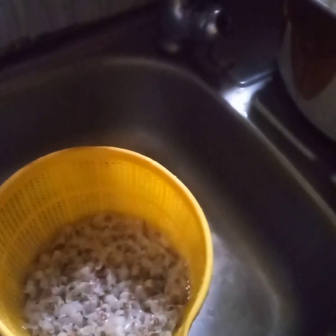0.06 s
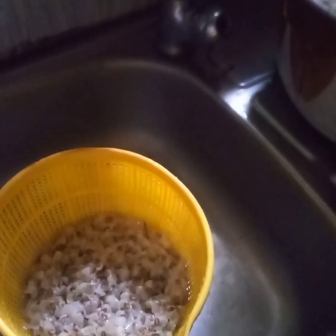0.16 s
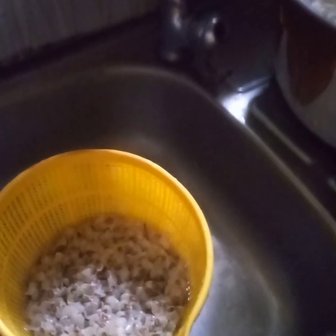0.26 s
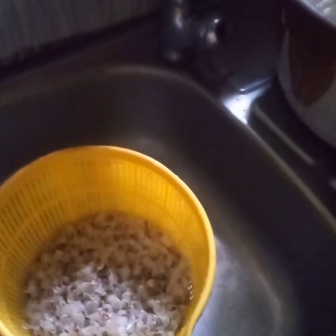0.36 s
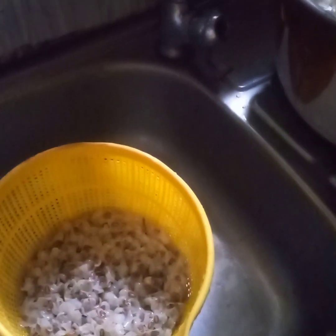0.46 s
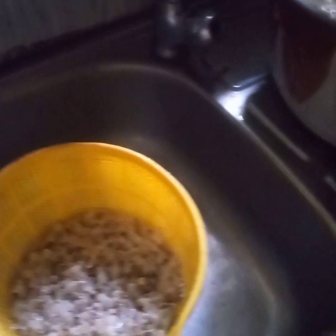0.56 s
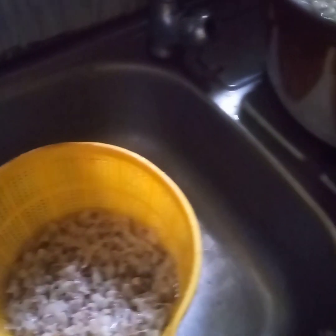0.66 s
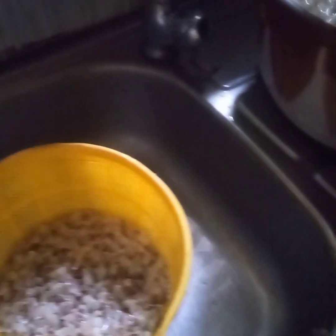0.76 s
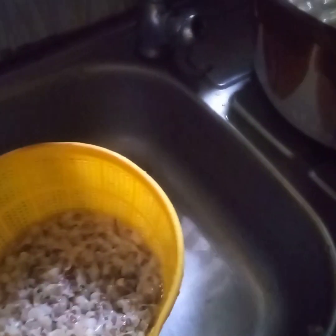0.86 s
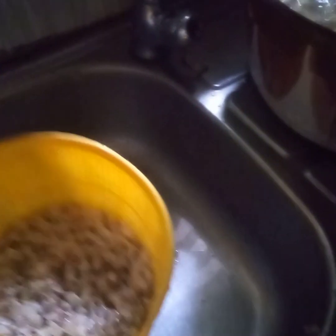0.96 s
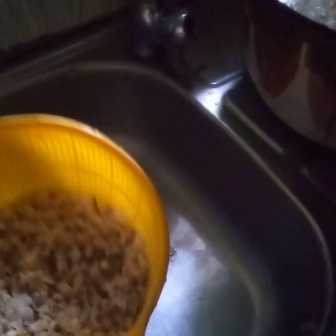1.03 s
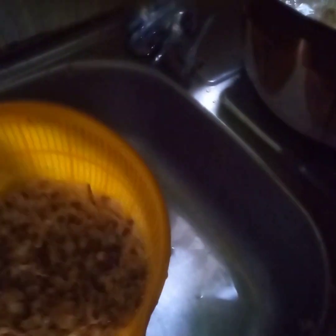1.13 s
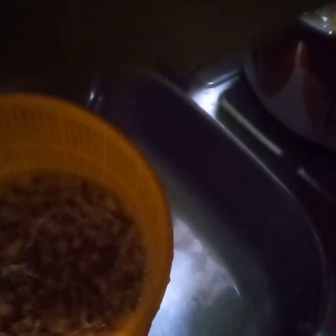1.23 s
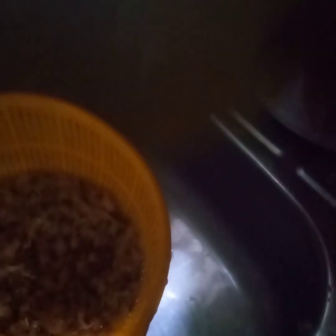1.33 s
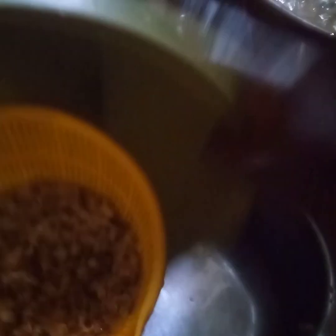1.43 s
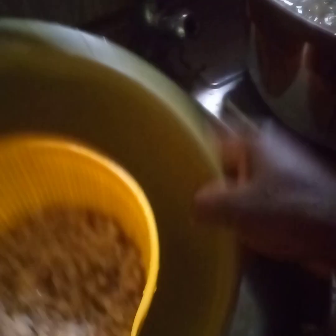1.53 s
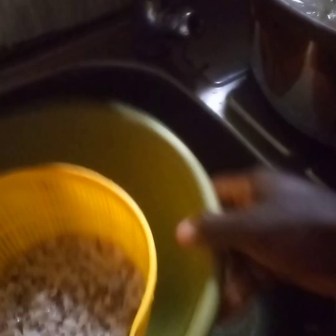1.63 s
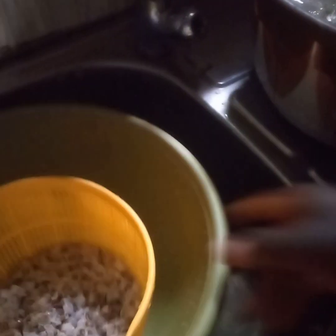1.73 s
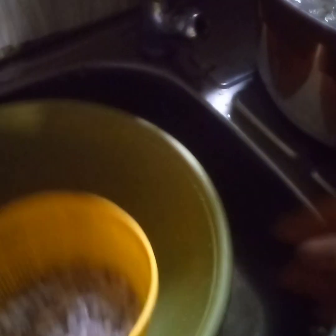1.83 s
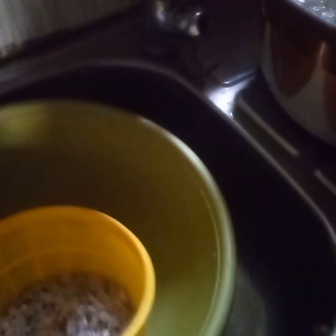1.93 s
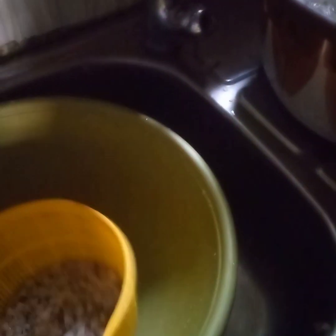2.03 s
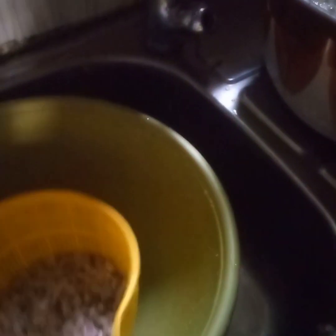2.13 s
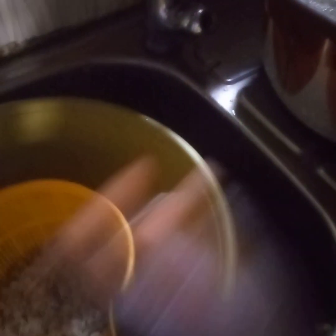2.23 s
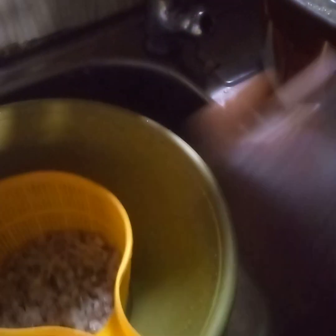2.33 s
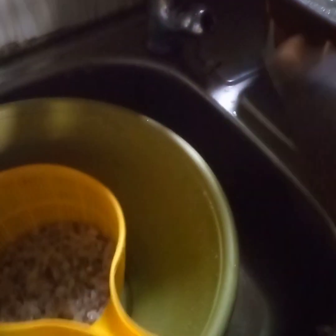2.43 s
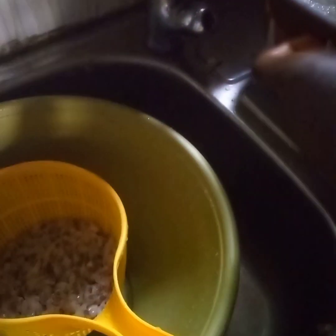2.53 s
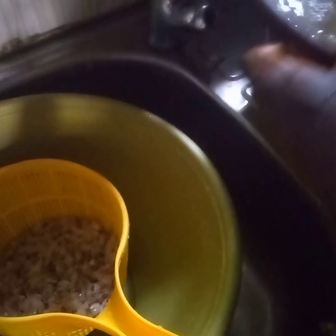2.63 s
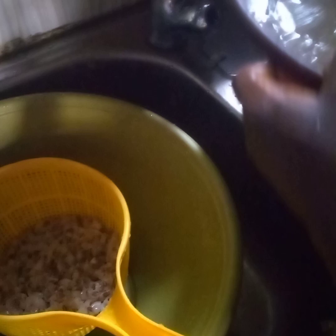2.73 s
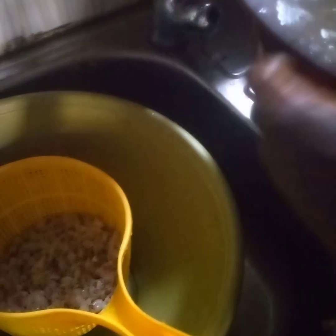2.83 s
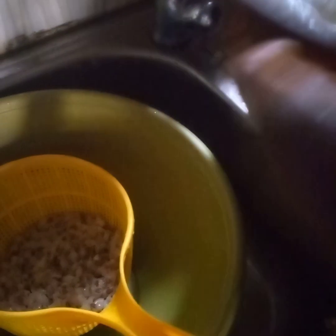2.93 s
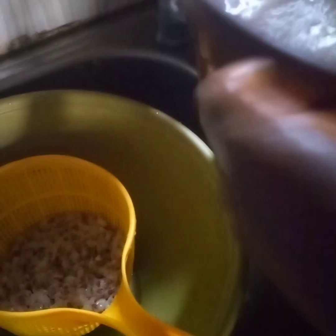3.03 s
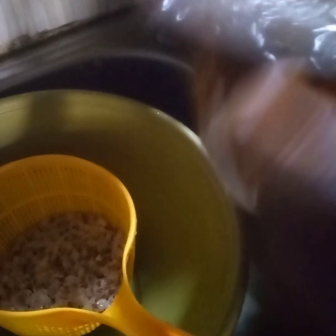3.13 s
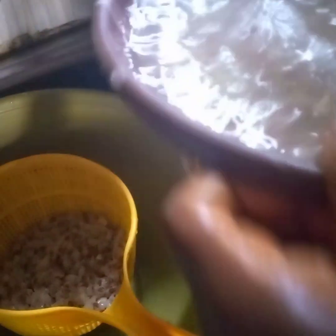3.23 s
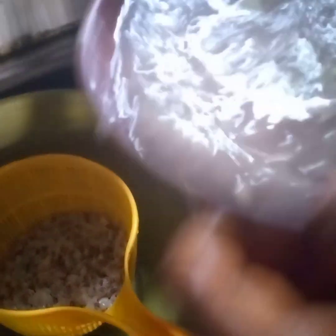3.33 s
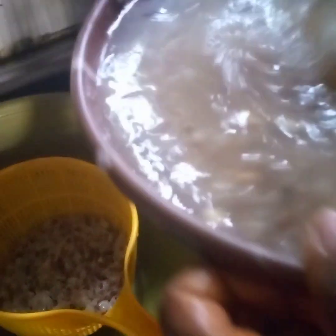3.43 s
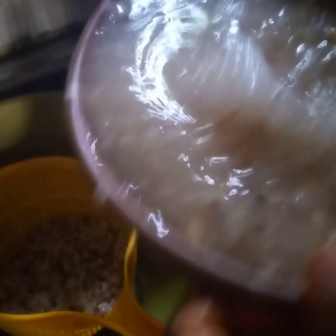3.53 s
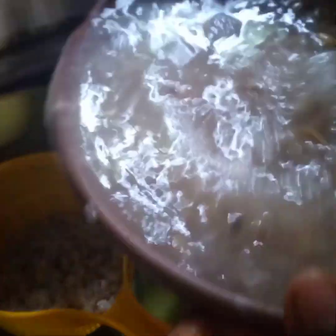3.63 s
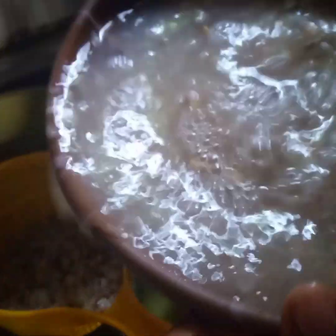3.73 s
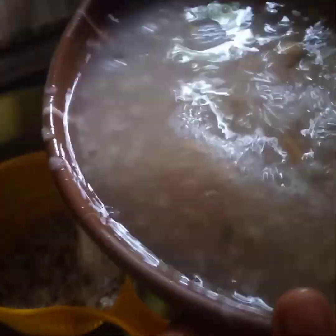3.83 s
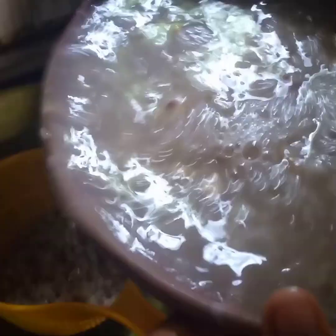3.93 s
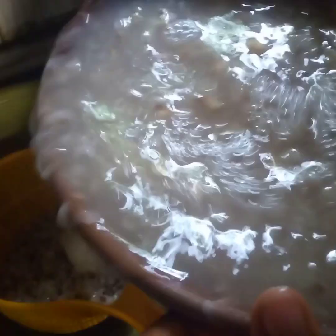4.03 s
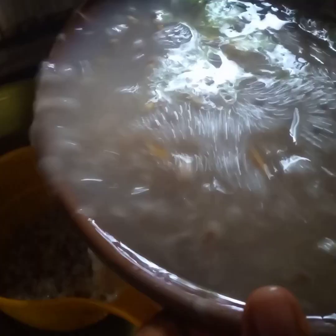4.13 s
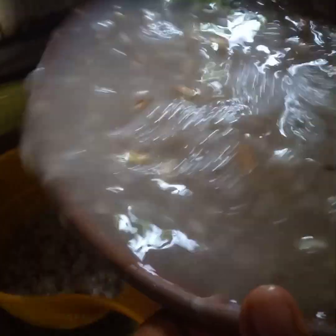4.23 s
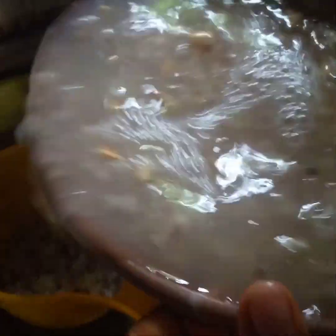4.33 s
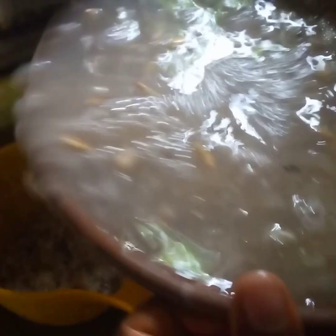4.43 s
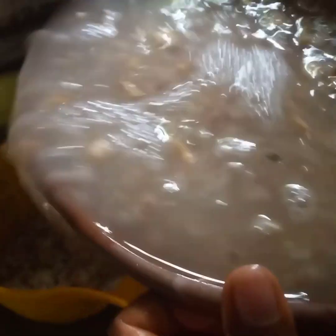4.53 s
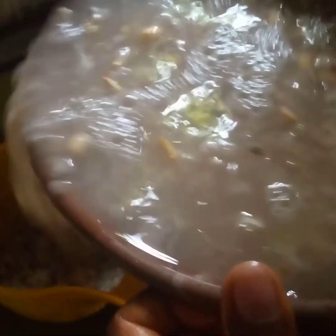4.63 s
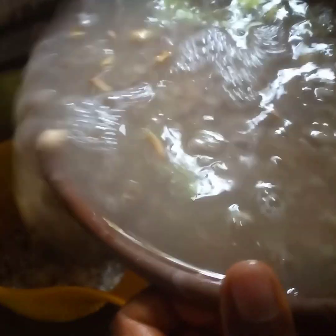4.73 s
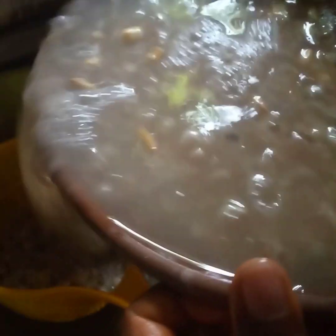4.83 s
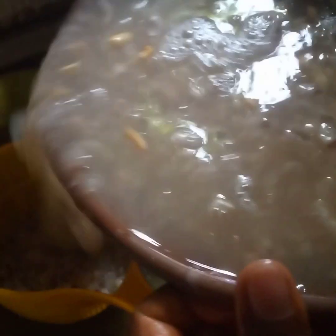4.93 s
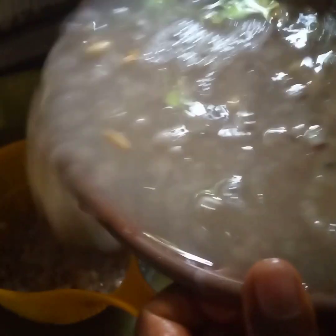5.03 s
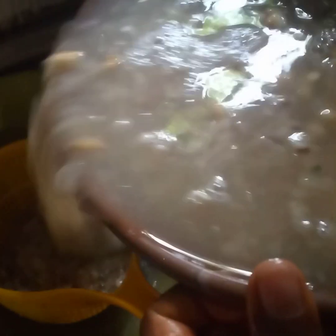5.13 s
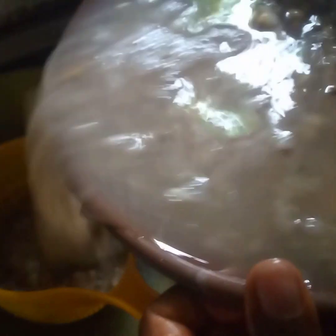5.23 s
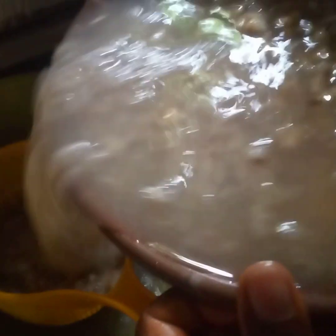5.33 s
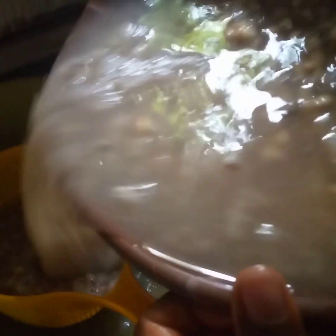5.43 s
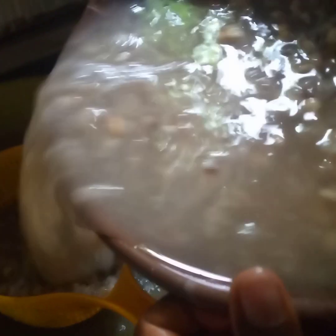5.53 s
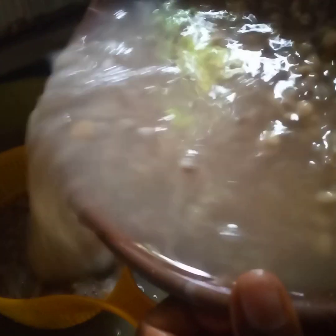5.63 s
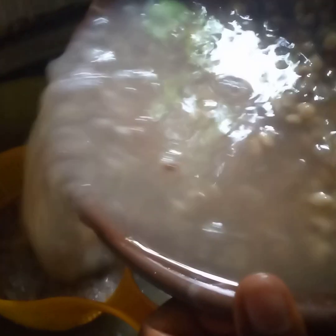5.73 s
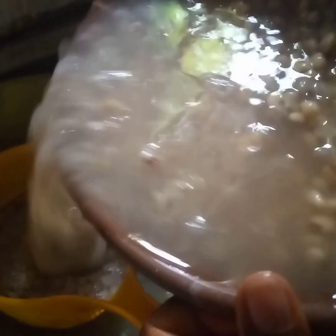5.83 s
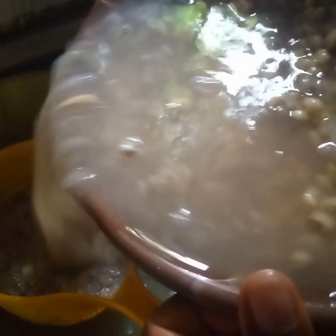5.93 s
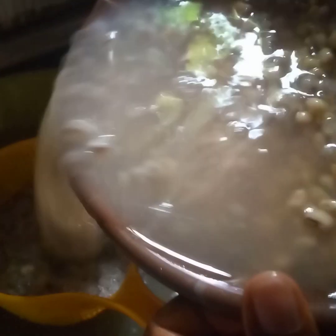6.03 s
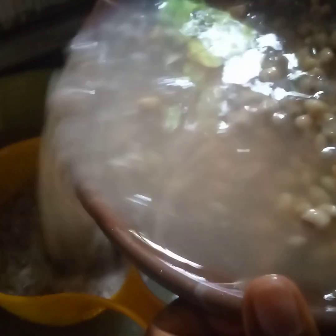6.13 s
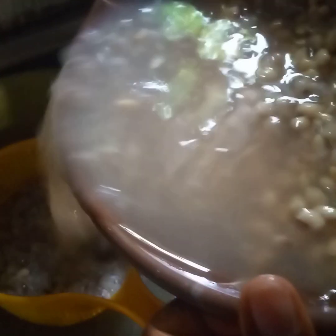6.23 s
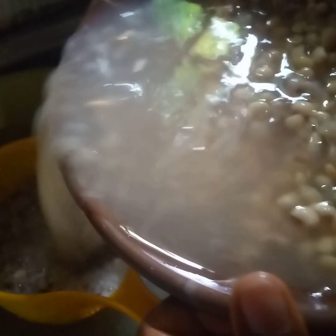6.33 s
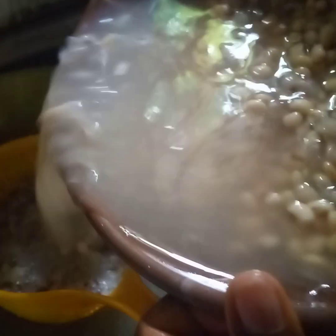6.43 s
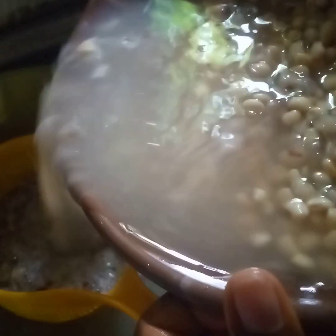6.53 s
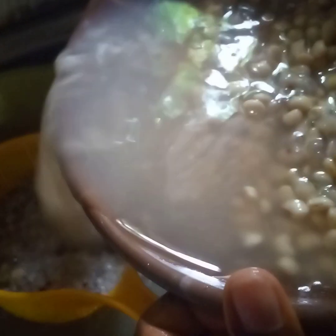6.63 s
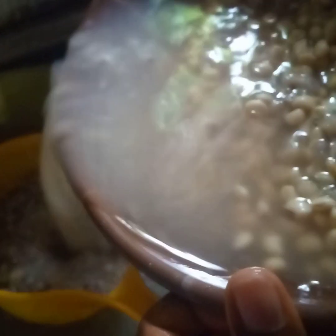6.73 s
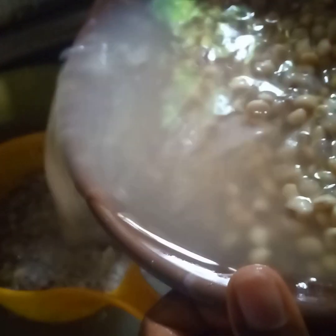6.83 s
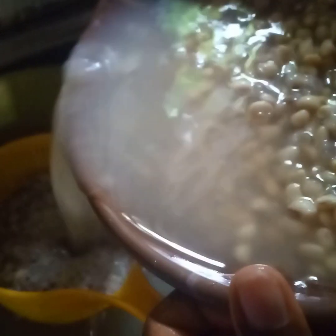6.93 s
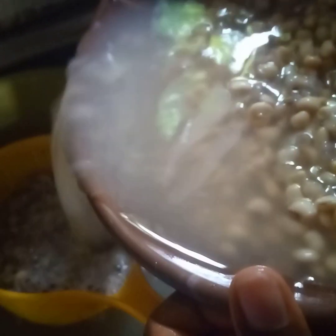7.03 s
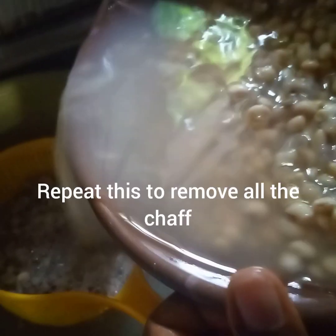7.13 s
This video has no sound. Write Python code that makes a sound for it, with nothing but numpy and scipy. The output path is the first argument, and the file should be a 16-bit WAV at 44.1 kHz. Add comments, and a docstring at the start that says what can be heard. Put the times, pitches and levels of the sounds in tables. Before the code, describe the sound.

A thin draining trickle with bright little plops fades within a second. Several hollow plastic-on-metal knocks follow, with soft sloshing and light thumps. Near silence comes next, only faint room air and a small distant bird. Then a small spill leads into a steady, clumpy pour, full of wet slaps, hard ticks and deepening gurgles, heard close in a short, hard kitchen echo.

```python
"""Small, hard kitchen, close by: water trickles through a plastic sieve into a steel sink and dwindles to drips.
A plastic basin is knocked into the sink under the sieve; rinsing water poured off a bowl of beans splatters in.
A small bird chirps now and then over faint room air. Water is filtered random impacts plus chirped bubble
tones; knocks are noise bursts and damped modes; the bird is two gliding sines with an echo."""
import sys
import numpy as np
from scipy import signal
from scipy.fft import rfft, irfft
from scipy.io import wavfile
from scipy.ndimage import uniform_filter1d

SR = 44100
rng = np.random.default_rng(int(sys.argv[2]) if len(sys.argv) > 2 else 0)


def master_out(mix):
    """Clip the mix to full scale and print it as 16-bit PCM to the path in sys.argv[1]."""
    frames = np.transpose(np.atleast_2d(mix))
    ceiling = np.clip(frames, -1, 1)
    pcm = np.round(ceiling * 32767).astype(np.int16)
    wavfile.write(sys.argv[1], SR, pcm)


N = 316197
T = np.arange(N) / SR

# Levels are ahead of the microphone; t60 = time to fall 60 dB.
# water draining through the sieve, before the trims in trickle(): [t/s, splash level/dB, gurgle level/dB]
DRAIN_LEVELS = [(0.0, -40.5, -51.5), (0.264, -45, -52), (0.294, -45.5, -58.5), (0.426, -49.5, -52),
                (0.464, -40, -48.5), (0.51, -44, -52.5), (0.572, -47, -42), (0.692, -36.5, -49),
                (0.8, -56, -50)]
# water sloshing in sink and basin; the last is the bowl scraping off the counter:
# [start t/s, hold/s, splash level/dB, gurgle level/dB]
SLOSH_AND_SCRAPE_SWELLS = [(1.276, 0.64, -63, -52.5), (2.046, 0.53, -60, -52.5), (2.379, 0.045, -79, -46),
                           (2.543, 0.23, -53, -51.5)]
# spectra of drain, slosh (and scrape) and pour: [f/Hz, relative level/dB per Hz]
DRAIN_SPECTRUM = [(29, -54), (50, -26.5), (125, -6), (353, 2), (428, -5.5), (483, 0.5), (711, -4),
                  (1240, -3), (1430, -6.5), (1910, -3), (4140, -9.5), (6710, -10.5), (13500, -18),
                  (16000, -18.5)]
SLOSH_SPECTRUM = [(29, -52.5), (50, -21), (119, -10), (264, -15.5), (362, 1.5), (408, -9), (472, -8),
                  (746, -22), (1210, -18.5), (3330, -29), (9870, -38), (13500, -52.5), (16000, -47)]
POUR_SPECTRUM = [(24, -55), (40, -20.5), (180, -7), (372, -5.5), (422, -9.5), (570, -4.5), (770, -9.5),
                 (918, -5), (1120, -7), (1680, -6.5), (2210, -9.5), (6490, -8.5), (10200, -11.5),
                 (13400, -18), (16000, -13)]
# strength of the poured stream, before its random clumping: [t/s, level/dB]
POUR_FLOW = [(4.25, -50), (4.3, -33.5), (4.38, -42.5), (4.45, -41), (4.65, -35), (5.35, -34.5), (5.6, -35),
             (5.92, -33.5), (6.3, -33.5), (6.55, -35.5), (6.96, -37), (7.1, -39.5)]
# resonances of the basin's hollow, added to the stream: [f/Hz, width/Hz, level/dB]
HOLLOW_MODES = [(200, 90, -7), (576, 42, 3), (931, 45, -5), (1320, 30, -10), (1690, 150, -9),
                (2740, 60, -12)]
# slaps of water and falling beans, before trim: [t/s, peak level/dB, centre f/Hz, spray level/dB]
SPLAT_EVENTS = [(0.3146, -28, 6000, -1), (0.3695, -30.5, 3260, -4), (0.6509, -25.5, 6930, -10),
                (0.677, -23, 3580, -20), (0.7138, -27, 6800, -10), (0.839, -31.5, 4990, -20),
                (0.8917, -34.5, 3420, -13), (1.6302, -39, 2420, -21), (3.9299, -30.5, 2580, -11),
                (4.2774, -24.5, 2596, -11), (4.4654, -18, 6700, -12), (4.621, -24, 2700, -7),
                (4.699, -19.5, 2100, -9), (4.8995, -21, 6200, -10), (5.0293, -19.5, 4290, -1),
                (5.1422, -27, 4600, -5), (5.1663, -19, 5600, -17), (5.2694, -21, 3080, 1),
                (5.3108, -12.5, 5560, -7), (5.4377, -17, 5700, -13), (5.6408, -17.5, 6690, -18),
                (5.902, -10.5, 8800, -13), (6.0246, -19.5, 6600, -14), (6.0841, -21, 2940, -1),
                (6.2906, -19, 4720, -15), (6.3814, -13.5, 7800, -9), (6.3855, -17.5, 6960, -19),
                (6.4648, -14, 2700, -11), (6.7703, -19, 3450, 7), (6.8488, -18, 3060, -6),
                (6.9571, -17, 2000, -11), (7.1492, -18.5, 2060, -8)]
# spectrum of slap and spray: [f/Hz, relative level/dB]
SPRAY_SPECTRUM = [(100, -3), (600, -13), (3000, 5), (7000, 9), (10500, 3.5), (13000, -30), (15500, -8)]
# hard ticks of beans hitting the plastic, some at the front of a splat: [t/s, peak level/dB, centre f/Hz]
TICK_EVENTS = [(4.465, -21, 6600), (4.621, -19, 4000), (4.898, -17, 10000), (5.0285, -15, 4300),
               (5.7272, -14, 4400), (5.8584, -14, 10000), (6.33, -21, 15000), (6.3805, -15, 8000),
               (6.748, -22, 7300), (6.847, -17, 3100), (7.0302, -16, 5900), (7.1484, -16, 2100)]
# drips and single bubbles, before trim: [t/s, peak level/dB, pitch f/Hz]
DRIP_EVENTS = [(.289, -30, 3010), (0.413, -29.5, 2970), (.823, -32.5, 1244), (0.914, -31, 1240),
               (.947, -38, 2120), (0.993, -39, 6890), (0.999, -31.5, 1262), (1.021, -43, 3080),
               (1.068, -34, 9600), (1.072, -40, 1274), (1.128, -25, 3680), (1.154, -27, 1306),
               (1.317, -32, 2780), (1.563, -33, 1346), (2.938, -57, 6680), (3.041, -58, 9080),
               (4.567, -29, 950), (4.804, -28.5, 310), (5.03, -33, 243), (5.04, -23.5, 1664),
               (5.083, -23.5, 1770), (5.098, -23.5, 933), (5.5, -24, 780), (5.525, -25, 760),
               (5.55, -27, 600), (5.955, -22.5, 607), (6.957, -17.5, 1895)]
# knocks of basin and sieve on the sink; at 2.2-2.4 s low slosh laps, from 2.6 s soft bowl thumps;
# before room and trims:
# [t/s, force level/dB, then re force: wall ring/dB, floor thud/dB, contact crack/dB, rim tock/dB]
KNOCK_EVENTS = [(1.175, -18.5, -15, -9, -2, -30), (1.257, -27, -27, -20, -24, -35),
                (1.3513, -17.5, -8, -21, 3.5, 12), (1.388, -10.5, -2.5, -24.5, -28, 7.5),
                (1.7163, -9, -9, -10, 7.5, -1), (1.7427, -8, -10.5, -12.5, -2, 5),
                (1.764, -14, -4, -6, -22, 1), (1.899, -18.5, 2.5, -9.5, -7, 3.5),
                (1.96, -17.5, -3, -20, -1, -8), (1.9832, -13, -9, -46, -11, -15),
                (2.069, -24.5, -12.5, -19, -9, 2), (2.224, -42.5, 5, -16, -22, 2),
                (2.411, -41.5, 4, -25, -19, 4), (2.614, -54.5, 1, 23.5, -9, -4),
                (2.636, -52, 16, 21, 25, 3), (2.695, -52, 17.5, 16, 21, 12)]
# modes of basin and sink wall, sink floor, heavily damped plastic rim: [f/Hz, level/dB, t60/s]
WALL_MODES = [(244, 7.5, 0.2), (281, 2, 0.4), (339, 6.5, .15), (370, -2.5, 0.68), (446.4, -3.5, .15),
              (498, 2.5, 0.28), (568, 4.5, 0.14), (649, -11, 0.5), (894, -9, 0.29), (1123, -12, 0.17),
              (1224, -5.5, 0.31), (1475, -8, 0.091), (1530, -9.5, 0.15), (1620, -18.5, .2),
              (1970, -14, .17), (2140, -16, .17), (2420, -7, 0.16)]
FLOOR_MODES = [(66, -12, 0.23), (82.5, -6.5, 0.16), (113, -14.5, 0.62), (130, 2, 0.37), (164.6, -6.5, 0.28),
               (207.4, -10, 0.38)]
RIM_MODES = [(296, 0.5, 0.0099), (487, 1, 0.04), (1563, -7.5, 0.032), (2060, -14.5, 0.017)]
# spectra of the plastic's dense upper modes and of the contact: [f/Hz, relative level/dB per Hz]
CLATTER_SPECTRUM = [(100, -0.5), (300, 0), (500, 0), (750, -3), (1200, -2.5), (1600, -1.5), (2200, -6),
                    (3000, -16.5), (5000, -22), (9000, -40), (16000, -52)]
CRACK_SPECTRUM = [(200, -5), (1000, -0.5), (2500, 1), (4500, -1.5), (7000, -2), (10000, -6.5), (13000, -26),
                  (15500, -17)]
# full bowl carried, then tipped: [start t/s, hold/s, lapping level/dB, rumble level/dB]
CARRY_SWELLS = [(2.853, 1.7, -85.5, -80.5), (3.125, 0.24, -81.5, -91), (4.003, 0.092, -82, -63)]
# spectrum of the carried bowl's rumble: [f/Hz, relative level/dB per Hz]
RUMBLE_SPECTRUM = [(30, -2), (65, -2.5), (130, -17), (400, -17), (800, -29), (2000, -47.5)]
# bird calls, before the direct/echo mix: [t/s, level/dB]
CHIRP_EVENTS = [(.775, -48), (1.83, -43.5), (2.527, -44.5), (3.339, -45), (4.056, -44)]
# one call, both sides of the syrinx: [t from its start/s, upper f/Hz, level/dB, lower f/Hz, level/dB]
CALL_TRACK = [(0, 7130, -20, 6080, 1), (.008, 6900, -2.5, 6000, -25), (0.021, 6440, -7, 5800, 2.5),
              (.035, 6080, -3, 5340, -18.5), (.046, 6400, 1.5, 5450, -16), (.055, 7340, -10, 5640, -15.5),
              (0.072, 7080, -2, 5600, -34)]
# spectrum of the quiet room: [f/Hz, relative level/dB per Hz]
QUIET_SPECTRUM = [(18, -62), (30, -10.5), (295, -12.5), (345, -6), (437, -17.5), (702, -19), (822, -24),
                  (889, -13), (1160, -30), (4080, -25), (7870, -27.5), (9460, -20), (16000, -49.5)]
# response of the microphone's port: [f/Hz, gain/dB]
MIC_RESPONSE = [(5000, -1.5), (6000, -2), (6800, -1.5), (8200, -5.5), (10300, 1.5), (12300, -4.5),
                (14000, -4.5), (15000, 3.5), (15800, -0.5)]

DWINDLE_T60_S = 0.9  # drain after its last point
SLOSH_RISE_S, SLOSH_T60_S = 0.019, 0.26
# first spill over the bowl's rim
SPILL_S, SPILL_RISE_S, SPILL_HOLD_S, SPILL_T60_S = 3.925, 0.0068, 0.095, 0.27
SPILL_DB = -47.5
# gurgle re splash, shallow to deep as the pool gathers
POOL_S, POOL_GROWTH_S, SHALLOW_DB, DEEP_DB = 4.583, 0.2, -21, -6.5
DRIFTS_PER_S, CLUMP_RMS_DB, SURGE_RMS_DB = 20, 1.67, 1  # unevenness of stream and gurgle
GLUG_DB, GLUG_GROWTH_S = -5, 1.7  # big air pockets, full level re gurgle
SLAP_T60_S = 0.019
BUBBLE_T60_S = 0.037
PLOP_AT_1_KHZ_DB, PLOP_DB_PER_OCTAVE = -14, 4  # impact noise re bubble; small drops are more tick than tone
HELD_UNTIL_S, HAND_DAMPING = 1.7, 1.6  # hand-held basin decays this many times faster
CARRY_RISE_S, CARRY_T60_S = 0.045, 0.22
QUIET_DB = -77
ROOM_T60_S = 0.31
TOP_HZ = 15800


def undb(db):
    """Decibels to gain."""
    return 10 ** (np.asarray(db) / 20)


def unit(x):
    """Scale to rms 1."""
    return x / np.sqrt(np.mean(x ** 2))


def peak(x, db):
    """Scale to a peak level."""
    return x * undb(db) / np.abs(x).max()


def add(out, start_s, x):
    """Mix x into out from start_s."""
    i = max(int(start_s * SR), 0)
    out[i:i + len(x)] += x[:max(len(out) - i, 0)]


def colour(x, points):
    """Minimum-phase filter through (Hz, dB) points, by folding the cepstrum."""
    size = 4096
    hz, db = np.transpose(points)
    bin_hz = np.arange(size // 2 + 1) * SR / size
    log_gain = np.interp(np.log(bin_hz + 1), np.log(hz), np.log(undb(db)))
    cepstrum = irfft(log_gain)
    cepstrum[1:size // 2] *= 2
    cepstrum[size // 2 + 1:] = 0
    response = irfft(np.exp(rfft(cepstrum)))
    return signal.oaconvolve(x, response)[:len(x)]


def band(x, lo_hz, hi_hz, order=2):
    """Band-pass."""
    edges_hz = [lo_hz, min(hi_hz, SR / 2 - 1)]
    return signal.sosfilt(signal.butter(order, edges_hz, "band", fs=SR, output="sos"), x)


def resonate(x, hz, width_hz):
    """One resonance, gain 1 at its centre."""
    return signal.lfilter(*signal.iirpeak(hz, hz / min(width_hz, SR / 4), fs=SR), x)


def fade(t, t60_s):
    """Exponential decay, 60 dB in t60_s."""
    return np.exp(-np.log(1000) * t / t60_s)


def swell(start_s, rise_s, hold_s, t60_s):
    """Rise from start_s, then die away from hold_s after the start."""
    t = T - start_s
    return np.clip(t / rise_s, 0, 1) * fade(np.maximum(t - hold_s, 0), t60_s)


def walk(steps_per_s):
    """Smooth random drift of rms 1."""
    k = int(SR / steps_per_s)
    steps = np.repeat(rng.standard_normal(N // k + 1), k)
    return unit(uniform_filter1d(steps, k)[:N])


def room(x, near_db, far_db, near_t60_s=0.064):
    """Quick reflections inside the sink, then the kitchen's tail, from a new spot at each call."""
    t = T[:SR // 2]
    near, far = rng.standard_normal((2, len(t)))
    near = unit(near * fade(t, near_t60_s) * (t > 0.001))
    far = unit(far * fade(t, ROOM_T60_S) * (t > 0.008))
    response = (undb(near_db) * near + undb(far_db) * far) / np.sqrt(len(t))
    response[0] = 1  # direct sound
    return signal.oaconvolve(x, response / np.linalg.norm(response))[:len(x)]


def bubble(hz, cycles, glide):
    """Ringing air pocket whose pitch rises by the fraction glide as it nears the surface."""
    t = T[:int(cycles / hz * SR) + 2]
    turns = hz * t * (1 + glide * t / t[-1] / 2)
    return np.sin(2 * np.pi * turns) * fade(t, cycles / hz)


def droplets(count, spread_db):
    """Tiny impacts at random times, a few much bigger than the rest."""
    when, size, sign = rng.random((count, 3)).T
    size = undb(spread_db * np.minimum(-np.log(1 - size), 6))
    return unit(np.bincount((when * N).astype(int), size * np.sign(sign - 0.5), N))


def bubbles(count, spread_db, cycles, lo_hz=450, hi_hz=9000):
    """Cloud of ringing air pockets, the small high ones most frequent."""
    out = np.zeros(N)
    for when, pitch, size, life in rng.random((count, 4)):
        height = np.sqrt(pitch)
        hz = lo_hz * (hi_hz / lo_hz) ** height
        gain = undb(spread_db * min(-np.log(1 - size), 4)) * hz / np.sqrt(height + 0.16)
        add(out, when * N / SR, gain * bubble(hz, cycles * (0.5 + life), glide=0.14))
    return unit(out)


def water(spectrum, grains, splash_gain, gurgle_gain):
    """Coloured grains, split at 1.6 kHz into bright splash and low gurgle."""
    x = colour(grains, spectrum)
    low = signal.sosfiltfilt(signal.butter(3, 1600, fs=SR, output="sos"), x)
    splash = (x - low) * splash_gain / np.std(band(x, 2000, 14000))
    gurgle = low * gurgle_gain / np.std(band(x, 200, 1500))
    return splash + gurgle


def trickle(splash_trim_db=0.0, gurgle_trim_db=3.0):
    """Fine impacts and small bubbles on several spots of the sink; later soft sloshes and a bowl's scrape."""
    spots = []
    for _ in range(3):
        drops = droplets(count=9000, spread_db=1.5) * undb(2.2 * walk(35))
        spots.append(room(drops, near_db=-2.5, far_db=-5.5))
    fizz = room(bubbles(count=4000, spread_db=2.4, cycles=42), near_db=-5, far_db=-8)
    grains = unit(sum(spots)) + undb(-2) * fizz

    s, splash_db, gurgle_db = np.transpose(DRAIN_LEVELS)
    dwindle = fade(np.maximum(T - s[-1], 0), DWINDLE_T60_S)
    splash = undb(np.interp(T, s, splash_db) + splash_trim_db) * dwindle
    gurgle = undb(np.interp(T, s, gurgle_db) + gurgle_trim_db) * dwindle
    drain = water(DRAIN_SPECTRUM, grains, splash, gurgle)

    swell_gains = np.zeros((2, N))  # splash, gurgle
    for start_s, hold_s, *levels_db in SLOSH_AND_SCRAPE_SWELLS:
        swell_gains += np.outer(undb(levels_db), swell(start_s, SLOSH_RISE_S, hold_s, SLOSH_T60_S))
    return drain + water(SLOSH_SPECTRUM, grains, *swell_gains)


def pour():
    """Ragged sheet of water breaks in clumps, rings the basin's hollow and glugs in the growing pool."""
    spots = []
    for _ in range(4):
        drops = droplets(count=5000, spread_db=3.0) * undb(4.3 * walk(60))
        spots.append(room(drops, near_db=1.5, far_db=-6.5))
    froth = room(bubbles(count=4000, spread_db=2.7, cycles=32), near_db=-4, far_db=-8)
    grains = unit(sum(spots)) + undb(-2.5) * froth
    grains = grains + sum(undb(db) * resonate(grains, hz, width_hz) for hz, width_hz, db in HOLLOW_MODES)

    spill = undb(SPILL_DB) * swell(SPILL_S, SPILL_RISE_S, SPILL_HOLD_S, SPILL_T60_S)
    flow_db = np.interp(T, *np.transpose(POUR_FLOW), left=-120)
    flow = undb(flow_db + CLUMP_RMS_DB * walk(DRIFTS_PER_S))
    filling_s = np.maximum(T - POOL_S, 0)
    depth_db = DEEP_DB + (SHALLOW_DB - DEEP_DB) * np.exp(-filling_s / POOL_GROWTH_S)
    gurgle = flow * undb(depth_db + SURGE_RMS_DB * walk(DRIFTS_PER_S))

    pockets = bubbles(count=500, spread_db=2, cycles=12, lo_hz=120, hi_hz=650)
    pockets = unit(band(room(pockets, near_db=-6, far_db=-8), 103, 230, order=1))
    glug_growth = 1 - np.exp(-filling_s / GLUG_GROWTH_S)
    glugs = pockets * gurgle * undb(GLUG_DB) * glug_growth
    return water(POUR_SPECTRUM, grains, flow + spill, gurgle) + glugs


def splats(spray_t60_s=0.12, relative_width=0.14, broad_db=-9, trim_db=-0.5):
    """Each slap is a sharp noise burst with a longer, rougher spray of finer drops."""
    out, t = np.zeros(N), T[:SR // 3]
    for s, db, hz, spray_db in SPLAT_EVENTS:
        slap, spray, clump = rng.standard_normal((3, len(t)))
        spray = unit(spray * undb(2 * np.clip(clump, -2, 2)))
        burst = slap * fade(t, SLAP_T60_S) + undb(spray_db) * spray * fade(t, spray_t60_s)
        burst = resonate(burst, hz, relative_width * hz) + undb(broad_db) * burst
        burst = colour(burst, SPRAY_SPECTRUM)
        add(out, s, peak(room(burst, near_db=-3.5, far_db=-5.0), db))
    return undb(trim_db) * out


def ticks(t60_s=0.008):
    """Hard ticks of beans hitting the plastic, some at the front of a splat: short resonant noise bursts."""
    out, t = np.zeros(N), T[:SR // 4]
    for s, db, hz in TICK_EVENTS:
        click = resonate(rng.standard_normal(len(t)) * fade(t, t60_s), hz, hz / 2)
        add(out, s, peak(room(click, near_db=-8, far_db=-9), db))
    return out


def drips(glide=0.061, rise_s=0.0004, plop_t60_s=0.09, plop_width=0.078, trim_db=-4.0):
    """Single drops plop into standing water (narrow noise) and trap a bubble (rising tone)."""
    out, t = np.zeros(N), T[:SR // 3]
    for s, db, hz in DRIP_EVENTS:
        noise = rng.standard_normal(len(t))
        plop = band(noise, hz / (1 + plop_width), hz * (1 + plop_width)) * fade(t, plop_t60_s)
        drip = peak(plop, PLOP_AT_1_KHZ_DB + PLOP_DB_PER_OCTAVE * np.log2(hz / 1000))
        add(drip, 0, bubble(hz, BUBBLE_T60_S * hz, glide))
        drip = drip * (1 - np.exp(-t / rise_s))
        add(out, s, peak(room(drip, near_db=-12.5, far_db=-5), db))
    return undb(trim_db) * out


def ring(modes, t, scatter_db=2):
    """Damped modes, levels and pitches scattered a little at each call."""
    strength, detune = rng.standard_normal((len(modes), 2)).T
    out = np.zeros(len(t))
    for k, (hz, db, t60_s) in enumerate(modes):
        gain = (-1) ** k * undb(db + scatter_db * strength[k])
        mode_hz = hz * (1 + 0.004 * detune[k])
        out += gain * fade(t, t60_s) * np.sin(2 * np.pi * mode_hz * t)
    return out


def knocks(clatter_t60_s=0.11, crack_t60_s=0.02, tail_db=-21, tail_t60_s=0.77, thud_rise_s=0.01):
    """Knocks, then slosh laps and soft bowl thumps: crack, rim tock, clatter, wall ring, swelling floor boom."""
    sharp, body, t = np.zeros(N), np.zeros(N), T[:SR * 3 // 5]
    for s, db, ring_db, thud_db, crack_db, tock_db in KNOCK_EVENTS:
        contact, plastic = rng.standard_normal((2, len(t)))
        damping = HAND_DAMPING if s < HELD_UNTIL_S else 1
        tail = undb(tail_db) * fade(t * damping, tail_t60_s)
        clatter = colour(plastic * (fade(t, clatter_t60_s) + tail), CLATTER_SPECTRUM)
        crack = colour(contact * fade(t, crack_t60_s), CRACK_SPECTRUM)
        tock = ring(RIM_MODES, t[:SR // 8])
        walls = ring(np.array(WALL_MODES) / [1, 1, damping], t)
        thud = ring(FLOOR_MODES, t) * (1 - np.exp(-t / thud_rise_s))
        add(sharp, s, peak(crack, db + crack_db))
        add(sharp, s, peak(tock, db + tock_db))
        add(body, s, peak(clatter, db))
        add(body, s, peak(walls, db + ring_db))
        add(body, s, peak(thud, db + thud_db))
    sharp = undb(-2.5) * room(sharp, near_db=-9.5, far_db=-4.5)
    return sharp + undb(1.0) * room(body, near_db=-21, far_db=-11.5)


def handling():
    """Water laps faintly in the carried bowl (bubbles), which rumbles in the hands (low noise)."""
    lapping = room(bubbles(count=2000, spread_db=1.5, cycles=12, hi_hz=3000), near_db=0, far_db=0)
    lapping = unit(band(lapping, 600, 2000))
    rumble = unit(colour(rng.standard_normal(N), RUMBLE_SPECTRUM))
    out = np.zeros(N)
    for start_s, hold_s, lap_db, rumble_db in CARRY_SWELLS:
        carry = swell(start_s, CARRY_RISE_S, hold_s, CARRY_T60_S)
        out += carry * (undb(lap_db) * lapping + undb(rumble_db) * rumble)
    return out


def bird(direct_db=-8, echo_t60_s=0.25):
    """Two thin whistles glide together, smeared by the walls on their way in."""
    out, t = np.zeros(N), T[:SR // 3]
    s, *columns = np.transpose(CALL_TRACK)
    upper_hz, upper_db, lower_hz, lower_db = (np.interp(t, s, c) for c in columns)
    gate = np.clip(np.minimum(t, s[-1] - t) / 0.0028, 0, 1)  # 2.8 ms ramps
    for start_s, db in CHIRP_EVENTS:
        turn = 2 * np.pi * (1 + 0.0027 * rng.standard_normal()) / SR  # slight detune per call
        upper = undb(upper_db) * np.sin(turn * np.cumsum(upper_hz))
        lower = undb(lower_db) * np.sin(turn * np.cumsum(lower_hz))
        call = gate * (upper + lower)
        walls = rng.standard_normal(len(t)) * fade(t, echo_t60_s)
        echo = signal.fftconvolve(call, walls / np.linalg.norm(walls))[:len(t)]
        add(out, start_s, undb(db) * (undb(direct_db) * call + echo))
    return out


def quiet():
    """Faint room air: coloured noise, level drifting by 1 dB rms."""
    return unit(colour(rng.standard_normal(N), QUIET_SPECTRUM)) * undb(QUIET_DB + walk(35))


def scene():
    """All sources at the one microphone."""
    wet = trickle() + pour() + splats() + ticks() + drips()
    return (wet + knocks() + handling() + bird() + quiet())[None]


def record(dry):
    """Microphone colours the treble; recorder cuts the deep bass and the top."""
    x = colour(dry[0], MIC_RESPONSE)
    x = signal.sosfilt(signal.butter(3, 50, "high", fs=SR, output="sos"), x)
    return signal.sosfilt(signal.ellip(12, 0.2, 80, TOP_HZ, fs=SR, output="sos"), x)[None]


dry = scene()
out = record(dry)
master_out(out)
```